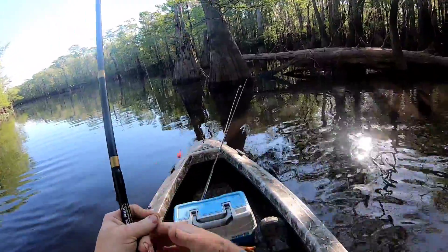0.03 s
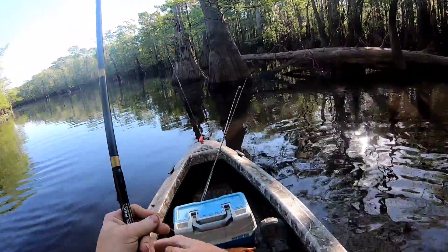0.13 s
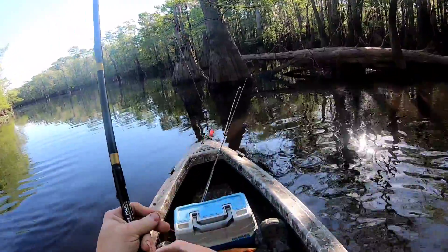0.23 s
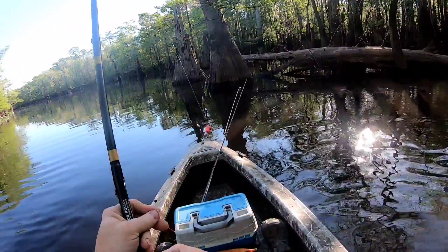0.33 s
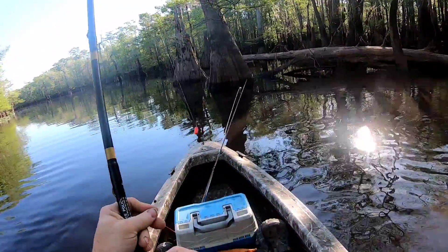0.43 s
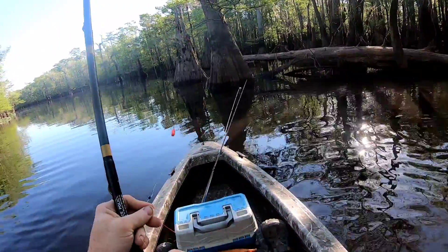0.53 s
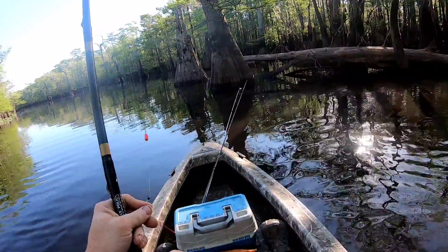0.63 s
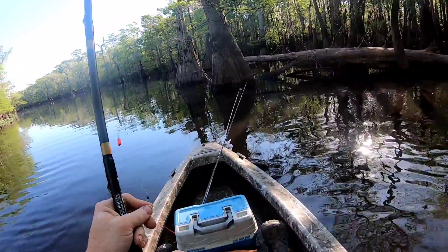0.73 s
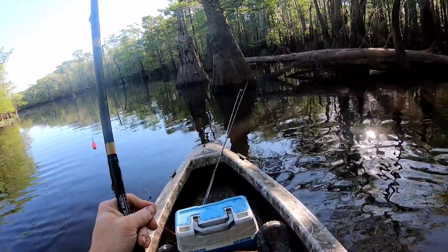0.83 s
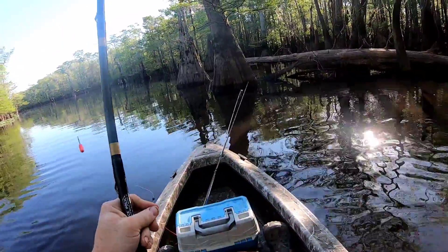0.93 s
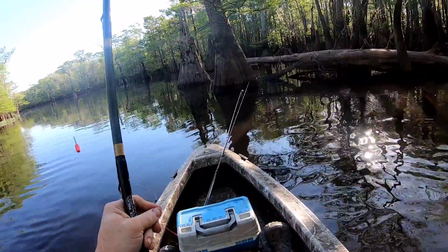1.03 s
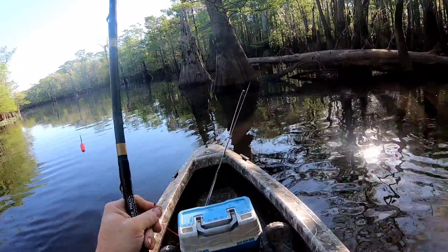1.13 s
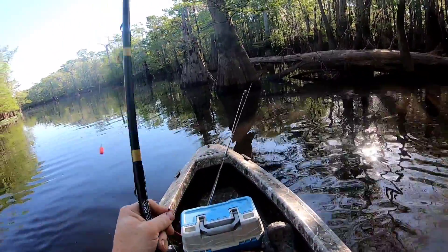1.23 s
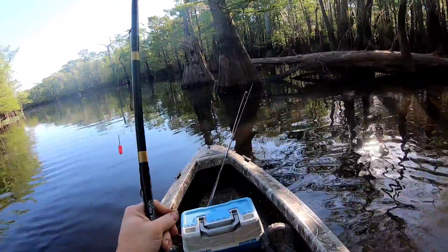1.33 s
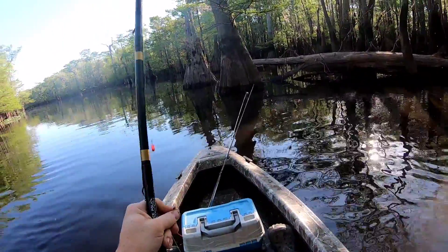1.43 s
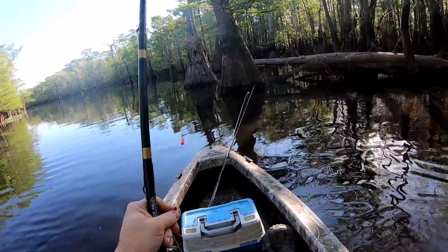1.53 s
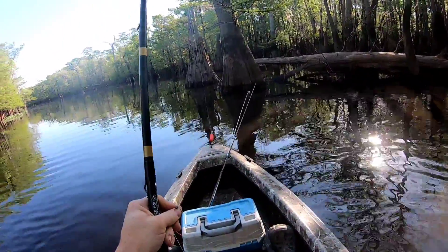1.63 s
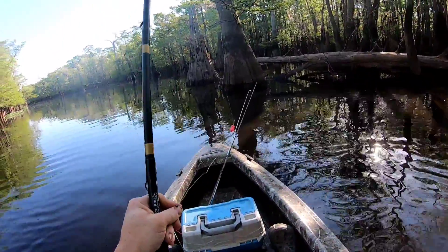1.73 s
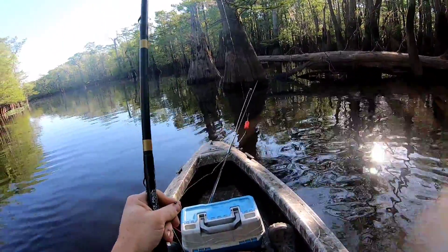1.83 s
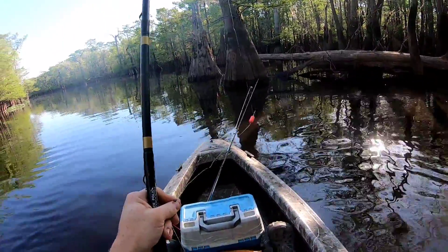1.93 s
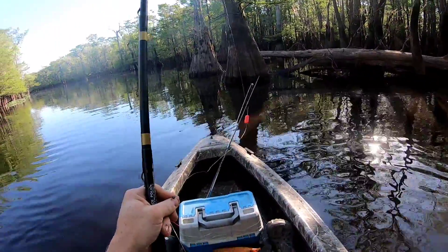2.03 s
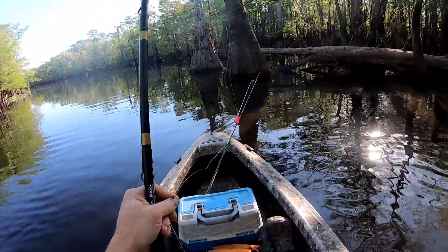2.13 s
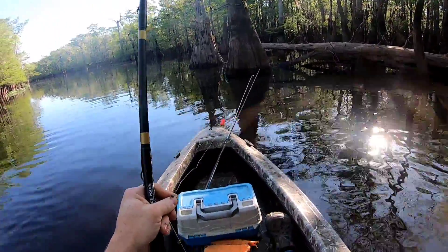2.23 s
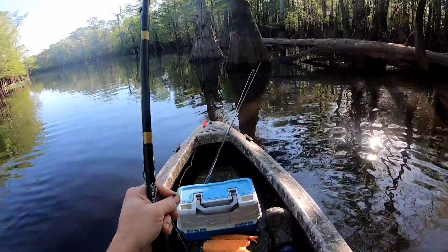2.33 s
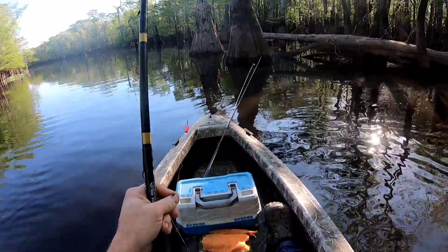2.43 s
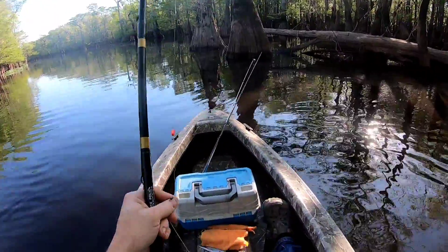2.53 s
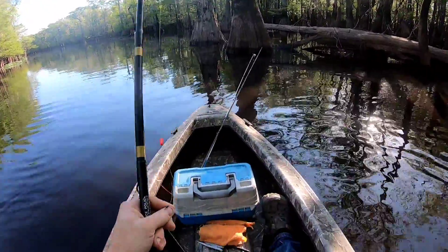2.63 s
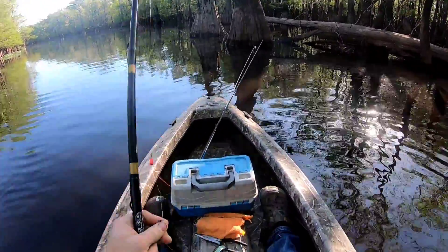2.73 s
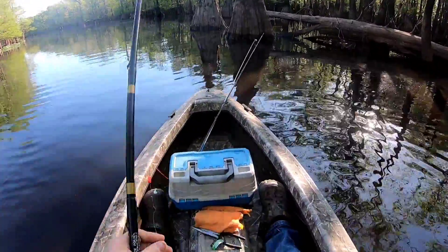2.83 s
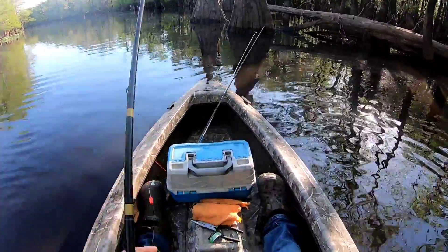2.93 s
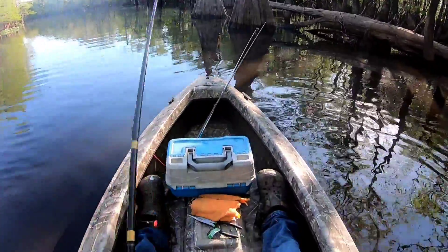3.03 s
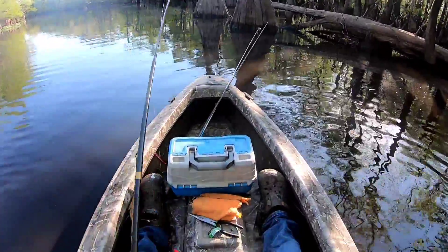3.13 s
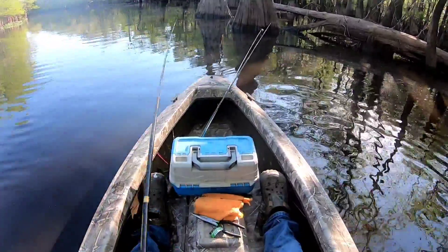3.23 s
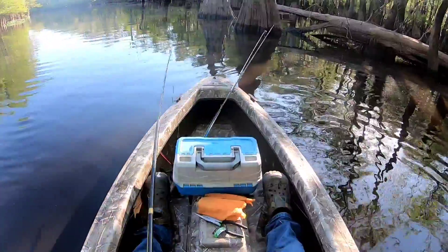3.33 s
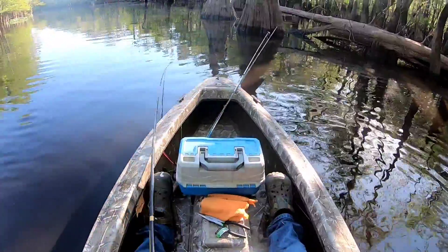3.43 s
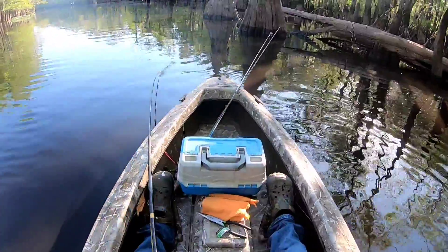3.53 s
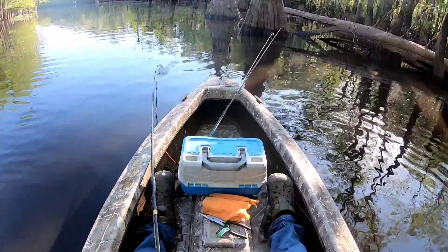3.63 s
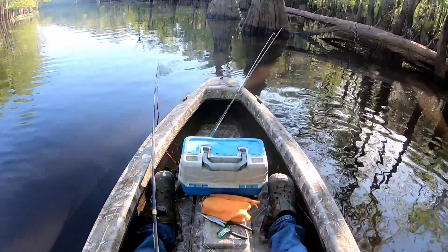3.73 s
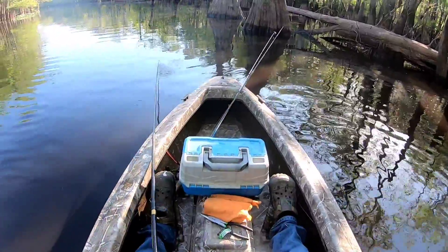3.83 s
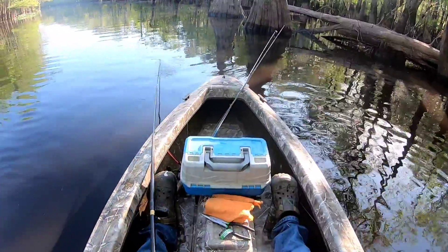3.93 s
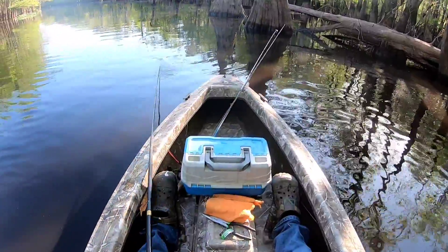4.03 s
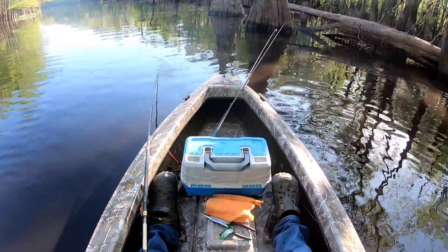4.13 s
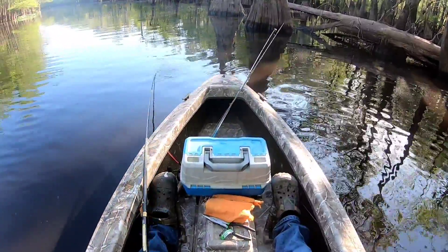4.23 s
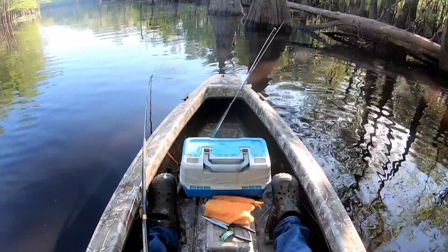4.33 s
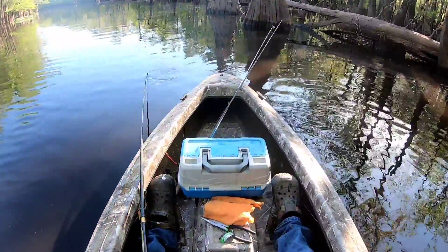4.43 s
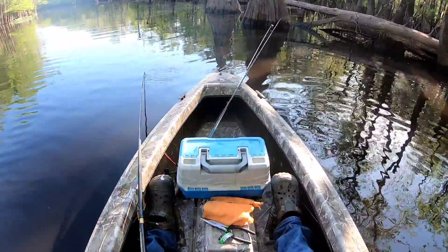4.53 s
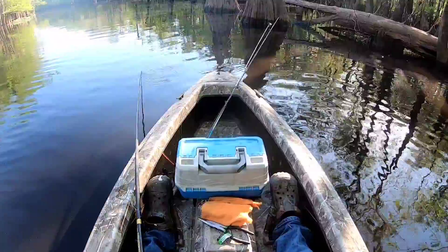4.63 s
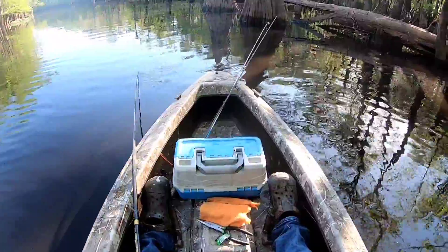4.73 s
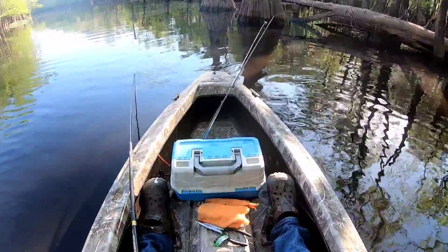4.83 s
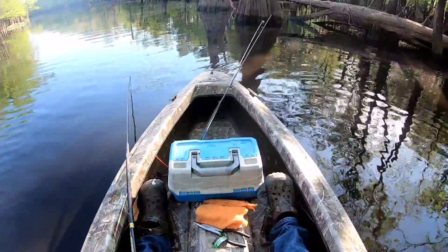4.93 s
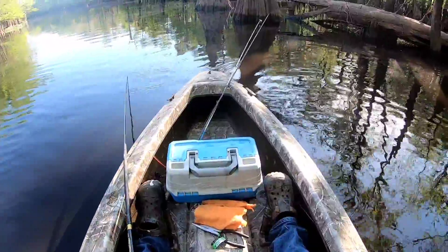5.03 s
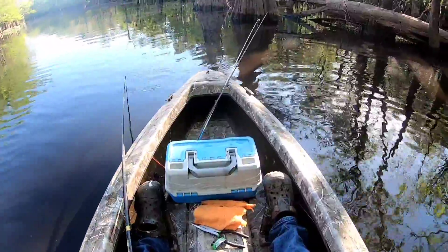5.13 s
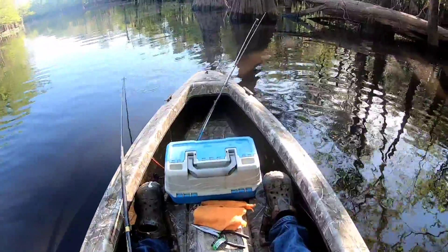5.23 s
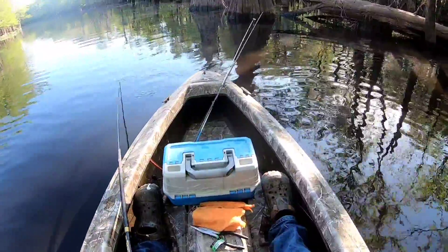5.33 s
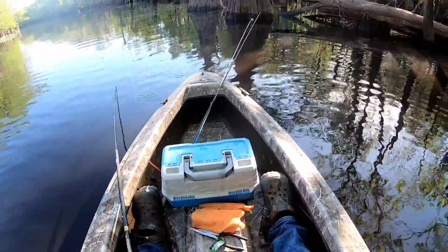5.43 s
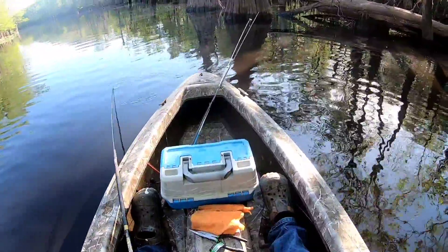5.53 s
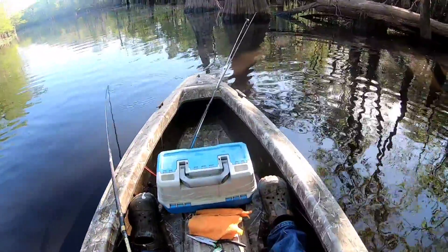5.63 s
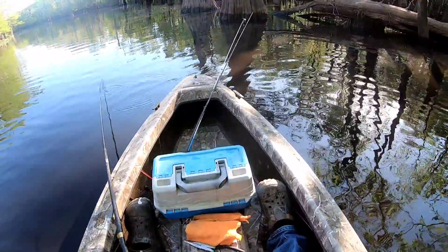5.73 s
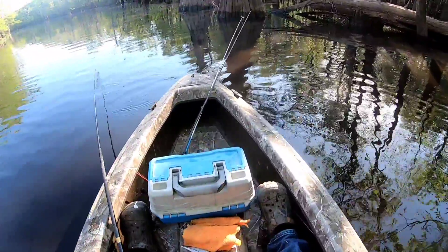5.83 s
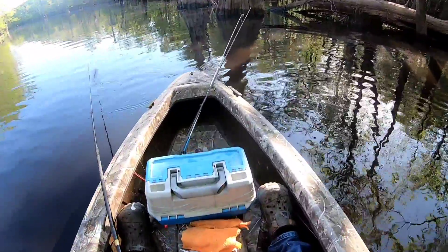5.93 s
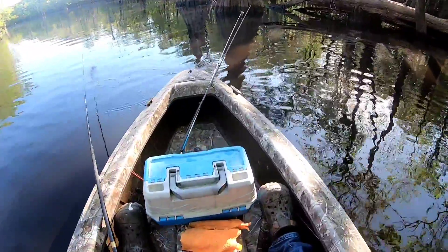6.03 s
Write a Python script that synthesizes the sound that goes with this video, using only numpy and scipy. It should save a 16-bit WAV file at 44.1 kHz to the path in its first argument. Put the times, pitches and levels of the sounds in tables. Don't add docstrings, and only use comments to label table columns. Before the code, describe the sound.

Fishing gear ticks, knocks and booms in a hollow plastic boat while birds chip, scold and a warbler's two-note song swells through echoing woods.

```python
import sys
import numpy as np
from scipy import signal
from scipy.fft import rfft, irfft, next_fast_len
from scipy.io import wavfile
from scipy.ndimage import uniform_filter1d

SR = 44100
rng = np.random.default_rng(int(sys.argv[2]) if len(sys.argv) > 2 else 0)


def boost_factor(decibels):
    exponent = np.asarray(decibels, float) / 20
    return 10 ** exponent


def int16_out(signal):
    q = np.round(np.clip(np.atleast_2d(signal).T, -1, 1) * 32767)
    wavfile.write(sys.argv[1], SR, q.astype(np.int16))


N = 268569


def in_time(rows):
    s, *columns = np.transpose(rows)
    return [np.interp(np.arange(N) / SR, s, column) for column in columns]


def over_octaves(points, hz, **ends):
    knots_hz, values = np.transpose(points)
    return np.interp(np.log(hz), np.log(knots_hz), values, **ends)


def at_hz(points, hz):
    return over_octaves(points, hz, left=-60, right=-60)


def rms_one(x):
    return x / np.sqrt(np.mean(x ** 2))


def drift(rate):
    steps = uniform_filter1d(rng.standard_normal(1200).repeat(4), size=4)
    return rms_one(np.interp(np.arange(N) / SR * rate * 4, np.arange(len(steps)), steps))


def add(out, s, sound, pan_db=0):
    at = int(s * SR)
    out[:, at:at + sound.shape[-1]] += sound[..., :N - at] * boost_factor([[pan_db / 2], [-pan_db / 2]])


def filtered(x, order, cut_hz, kind):
    return signal.sosfilt(signal.butter(order, cut_hz, kind, fs=SR, output="sos"), x)


def ear_pair(mid, side, alike):
    return np.sqrt(1 + alike) * mid + np.sqrt(1 - alike) * side * [[1], [-1]]


def whistle(s, hz, db):
    t = np.arange(s[0], s[-1], 1 / SR)
    phase = 2 * np.pi * np.cumsum(np.interp(t, s, hz)) / SR
    return boost_factor(np.interp(t, s, db)) * np.sin(phase)


def struck(modes, force, scatter, wide, count=4):
    hz, db, t60 = np.repeat(modes, count, axis=0).T[:, :, None]
    t = np.arange(int(np.clip(.8 * t60.max(), .01, .25) * SR)) / SR
    detune, mid, side = rng.normal(0, 1, (3, len(hz), 1))
    mid = np.sign(mid) * (.7 + .3 * abs(mid))
    rings = boost_factor(db - 60 * t / t60) * np.sin(2 * np.pi * hz * (1 + scatter * detune) * t)
    both = np.array([(rings * (mid + wide * side)).sum(0), (rings * (mid - wide * side)).sum(0)])
    sound = signal.fftconvolve(both, force[None], axes=1)
    sound = signal.lfilter(*signal.butter(2, hz.min() * .6, "high", fs=SR), sound)
    return sound / np.max(np.abs(sound.mean(0)))


# pitch_hz, likeness (0..1)
LIKENESS = [(60, 0.3), (180, 0.72), (400, 0.29), (1650, 0.099), (5000, .4), (15000, 0.28)]


def coloured(spectrum, patchy_db, grain_db=0.0):
    size = next_fast_len(N)
    white = rng.standard_normal((2, size)) * boost_factor(grain_db * np.minimum(rng.exponential(1, size), 6))
    mid, side = rfft(white)
    hz = np.maximum(np.fft.rfftfreq(size, 1 / SR), 1)
    alike = np.clip(over_octaves(LIKENESS, hz), 0, 1)
    pair = boost_factor(at_hz(spectrum, hz)) * ear_pair(mid, side, alike)
    low_hz, high_hz = spectrum[0][0], spectrum[-1][0]
    out = 0
    for centre in low_hz * 2 ** np.arange(0, np.log2(high_hz / low_hz) + .5, .5):
        low, high = np.searchsorted(hz, centre * np.sqrt([.5, 2]))
        band = np.zeros((2, high), complex)
        band[:, low:] = pair[:, low:high] * np.cos(np.pi * np.log2(hz[low:high] / centre)) ** 2
        out = out + irfft(band, size)[:, :N] * boost_factor(patchy_db * drift(14))
    return rms_one(out)


# pitch_hz, level_db (per Hz)
WOODS = [(180, -40), (300, -8.5), (447, -10), (737, 0), (1480, -11.5), (5700, -18.5), (9090, -23),
         (16000, -50.5)]
WOODS_DB = -71.5


def woods():
    return boost_factor(WOODS_DB - 2.5) * coloured(WOODS, patchy_db=0.56) * boost_factor([[-.6], [.6]])


# peak_s, fade_s (to drop 20 dB), air_db, hum_db
LURCHES = [(.3, .3, -70, -78), (.6, 0.18, -64, -60.5), (1.19, 0.08, -41, -69), (1.29, .08, -52, -72),
           (1.45, 0.15, -72, -69.5), (2.6, 0.3, -65, -56.5), (.8, 0.1, -83, -61), (3.06, 0.3, -70, -75),
           (3.25, 0.12, -69, -59.5), (3.62, .13, -55.5, -43), (4.13, 0.22, -85, -54.5),
           (4.259, 0.01, -48.5, -67), (4.6, 0.7, -71, -76), (1.6, .15, -90, -64), (1.98, .3, -86, -65),
           (2.33, .3, -84, -65), (5.25, 0.17, -51, -51.5), (5.7, 0.03, -57.5, -51.5),
           (5.87, 0.28, -53, -47.5), (6.08, 0, -53, -62)]
CALM_AIR_DB, CALM_HUM_DB = -88, -67


def lurching():
    s, fade, *levels = np.transpose(LURCHES)[:, :, None]
    t = np.arange(0, N + 64, 64) / SR
    gains = []
    for calm_db, db in zip((CALM_AIR_DB, CALM_HUM_DB), levels):
        swell = boost_factor(db - 20 * abs(t - s) / fade).max(0)
        gains.append(boost_factor(calm_db) + np.interp(np.arange(N) / SR, t, swell))
    return gains


# pitch_hz, level_db (per Hz)
HUM = [(40, -19), (70, -21), (108, -27), (135, -9.5), (180, -1), (215, -3.5), (260, -12), (320, -24)]


def hull_hum(gain):
    return gain * coloured(HUM, patchy_db=4.0)


def port_air(gain):
    right, own = rms_one(filtered(rng.standard_normal((2, N)), 4, [12, 36], "band"))
    left = .6 * np.roll(right, 420) + .3 * own
    return gain * np.array([left, 1.4 * right])


# at_s, rub_db, crisp_db (rustle re rubbing)
STIR = [(0, -95, 1), (.5, -79.5, -5.5), (.7, -73.5, -1.5), (1.0, -71, -7), (1.22, -71, 4.5),
        (1.52, -85, -6), (2.19, -90, -23), (2.47, -66.5, -7), (2.61, -61, -14.5), (2.75, -73, -8),
        (3.3, -75.5, -6), (3.68, -65.5, -1.5), (3.84, -69.5, -14), (4.09, -69.5, -19.5), (4.36, -86, -0.5),
        (4.6, -75.5, -6), (5.45, -74.5, -3), (6.09, -60, -7.5)]
# pitch_hz, level_db (per Hz)
RUB = [(250, -3), (330, 2.5), (700, -4), (900, -4), (1300, -4.5), (1800, -19.5)]
# pitch_hz, level_db (per Hz)
RUSTLE = [(900, -3.5), (1400, 3.5), (2500, 0), (4000, -3), (6500, -12.5), (9000, -16), (12000, -36)]


def cloth():
    rub_db, crisp_db = in_time(STIR)
    rubbing = boost_factor(rub_db + 2.0) * coloured(RUB, patchy_db=1.5, grain_db=3.0)
    gain = boost_factor(4.5) * (boost_factor(rub_db + crisp_db) + shaken() + sliding())
    return rubbing + gain * coloured(RUSTLE, patchy_db=1, grain_db=4.0) * boost_factor(2.0 * drift(40))


# start_s, panel_db (peak), crack_db (re panel), wall_hz (nearest wall tone), stretch (of decay)
THUMPS = [(0.086, -52.5, -4.5, 870, 0.72), (0.218, -53.5, -9.5, 830, 0.92), (0.533, -53, -12, 710, 0.97),
          (0.767, -49, -28, 506, .99), (0.801, -56, -26, 526, .99), (2.454, -47.5, -2.5, 1160, 0.47),
          (2.549, -36, -15, 513, 0.63), (3.452, -53.5, -3, 1460, .99), (3.492, -13.5, 2, 1160, 0.85),
          (3.741, -52.5, -6, 743, .99), (3.862, -55, -23, 1255, 0.98), (4.201, -50.5, -1.5, 805, 0.5),
          (4.313, -54.5, 2.5, 1340, 1), (4.823, -50, -1, 1166, 0.47), (4.967, -52.5, -7, 1283, 0.33),
          (5.179, -24.5, -10.5, 570, 0.61), (5.659, -22, -7, 790, .75), (5.7325, -37, 11.5, 670, 0.98),
          (5.774, -26, -39, 544, 0.53), (6.027, -23.5, -11.5, 726, 0.88)]
# start_s, panel_db (peak), wall_hz (nearest wall tone), stretch (of decay)
RAPS = [
    (1.069, -27, 1590, 0.26),
    (1.2154, -36.5, 1360, 0.34),
    (1.358, -60, 1440, .53),
    (3.212, -30, 870, 0.53),
    (3.223, -30, 1410, 0.91),
    (4.28, -61.5, 1125, 1),
    (5.085, -42, 1600, 0.68),
]
THUMP_BOOM_DB, RAP_BOOM_DB, RAP_CRACK_DB = -6, -40, 1
BOOM_GROWTH = 0.11


def blows():
    heavy = [(s, db, THUMP_BOOM_DB + BOOM_GROWTH * db, crack_db, hz, stretch)
             for s, db, crack_db, hz, stretch in THUMPS]
    light = [(s, db, RAP_BOOM_DB, RAP_CRACK_DB, hz, stretch) for s, db, hz, stretch in RAPS]
    return sorted(heavy + light)


def shaken():
    kicks = np.zeros(N)
    s, db = np.transpose(THUMPS)[:2]
    kicks[(s * SR).astype(int)] = boost_factor(db - 43.5)
    return signal.lfilter([1], [1, -boost_factor(-60 / (0.5 * SR))], kicks)


def dense_modes(bands, strength_db, focus_db, dull_db, wide):
    out, t = 0, np.arange(SR // 4) / SR
    white = rng.standard_normal((2, 2, N))
    for k, (hz, own_db, t60) in enumerate(bands):
        fading = np.full((2, N), 1e-9)
        levels_db = strength_db - dull_db * np.log2(hz / bands[0][0])
        for (s, *_, wall_hz, stretch), db in zip(blows(), levels_db):
            off_tone_db = focus_db * abs(np.log2(hz / wall_hz))
            add(fading, s - .0005, boost_factor(db + own_db - off_tone_db - 60 * t / (t60 * stretch)))
        mid, side = white[k % 2]
        noise = fading * [mid + wide * side, mid - wide * side]
        out = out + filtered(noise, 3, [hz / 1.15, hz * 1.15], "band") * np.sqrt(SR / hz)
    return out


# pitch_hz, level_db, t60_s
PANEL = [(347, -7.5, 0.33), (433, -8.5, 0.31), (513, -4, 0.13), (698, -4, 0.21), (841, -5.5, 0.15),
         (1210, 1, 0.099), (1564, 1.5, 0.064), (2016, -4.5, 0.11)]
# pitch_hz, level_db, t60_s
CRACK = [(2493, -3.5, 0.097), (3270, -3, 0.1), (4420, -3.5, 0.061), (5600, -5, 0.055), (6380, -2.5, 0.039),
         (9050, -10, 0.04), (11800, -25, 0.027)]


def hull_walls():
    _, db, _, crack_db, _, _ = np.transpose(blows())
    dull_db = .6 * np.maximum(-crack_db, 0)
    walls = dense_modes(PANEL, db - 5, focus_db=8.0, dull_db=0 * db, wide=0.3)
    return walls + dense_modes(CRACK, db + crack_db - 11, focus_db=-0.5, dull_db=dull_db, wide=0.61)


# pitch_hz, level_db, t60_s
BOOM = [(68.9, -21, .3), (87.5, -19, .3), (117.6, -8, 0.2), (151.2, -5, .25), (171.75, 0, .3),
        (209.7, -7, 0.27), (248.6, -7.5, .28), (300.6, -15.5, 0.3), (353.9, -10, .2)]


def hull_floor():
    floor, t = np.full((2, N), 1e-12), np.arange(SR // 12) / SR
    for s, panel_db, boom_db, *_ in blows():
        level_db = panel_db + boom_db
        rough = 0.017 * rng.standard_normal(len(t)) * np.exp(-t / 0.0034)
        push = t * (np.exp(-t / 0.00029) + rough)
        lasts = np.clip(boost_factor(.5 * (level_db + 21)), .75, 1)
        boom = struck(np.array(BOOM) * [1, 1, lasts], push, scatter=.05, wide=0.048, count=3)
        add(floor, s + 0.009, boost_factor(level_db + 7.0) * boom, -.3)
    return filtered(floor, 2, 75, "high")


# start_s, length_s, start_hz, end_hz, level_db
PIPES = [
    (0.103, 0.17, 2605, 2480, -79),
    (0.443, 0.086, 2520, 2520, -76),
    (0.905, 0.088, 7650, 7730, -73.5),
    (.96, 0.093, 7800, 8600, -82),
    (3.401, 0.07, 2840, 2785, -80.5),
    (3.63, .05, 8200, 8200, -74),
]
# start_s, length_s, start_hz, end_hz, level_db
BUZZES = [(1.44, 0.11, 5500, 5900, -88), (1.53, .06, 6150, 6350, -84), (1.59, 0.02, 4300, 3800, -83),
          (1.69, 0.1, 5400, 5800, -87), (1.795, 0.06, 6000, 6370, -82), (1.87, 0.02, 4500, 3800, -82),
          (1.93, 0.22, 6850, 6850, -81), (2.145, 0.025, 6400, 5200, -78), (2.22, 0.06, 6800, 7400, -85),
          (2.3, .08, 7050, 6900, -81), (2.362, 0.022, 6100, 5300, -76), (5.321, 0.34, 1253, 1316, -75)]
PIPE_SHAKE, BUZZ_SHAKE = 0.0012, 0.022


def far_birds():
    out, share = np.zeros((2, N)), np.linspace(0, 1, 40)
    swell_db = np.interp(share, [0, .15, .85, 1], [-15.0, 2.5, -1.5, -19.0])
    for calls, shake in ((PIPES, PIPE_SHAKE), (BUZZES, BUZZ_SHAKE)):
        for s, length, start_hz, end_hz, db in calls:
            hz = start_hz + (end_hz - start_hz) * share + shake * start_hz * rng.standard_normal(40)
            add(out, s, whistle(length * share, hz, db + swell_db), -2.0)
    return out


# start_s, level_db (peak), ring_hz, swell_ms, t60_ms
PUSHES = [(2.58, -46.5, 117.3, 16, 350), (4.101, -41, 224.3, 28, 134), (4.158, -45.5, 233.7, 15, 230),
          (1.0657, -42, 6960, 0.17, 3.3), (1.0715, -19.5, 6630, 0.11, 3.6), (1.069, -38, 342, 0.7, 14.6),
          (3.121, -47, 476, 3.1, 42), (3.475, -46.5, 2400, 0.4, 8), (3.482, -42.5, 892, 3.5, 24),
          (5.114, -40, 1680, .6, 8), (5.298, -47, 118.4, 6.1, 280), (5.799, -27, 105.8, 22.6, 158),
          (.56, -55, 300, 10, 100), (.79, -53, 300, 15, 130), (2.56, -43, 260, 6, 200),
          (3.112, -51, 300, 6, 70), (3.63, -50, 105, 20, 120), (3.245, -50, 190, 8, 120),
          (4.15, -53, 110, 15, 150), (5.19, -33, 160, 6, 250), (5.79, -40, 600, 3, 120),
          (6.034, -30, 165, 5, 150), (.377, -58, 800, 1.5, 25), (.755, -59, 1150, 8, 40),
          (.785, -64, 4800, 1.5, 12), (.815, -55, 650, 5, 60), (1.196, -51, 2500, .6, 10),
          (1.252, -54, 2600, .6, 12), (1.384, -59, 3200, .2, 4), (2.52, -59, 1200, 3, 30),
          (2.575, -48, 700, 4, 80), (3.093, -60, 1200, 2, 20), (3.465, -55, 7000, .8, 10),
          (5.186, -35, 275, 5, 200)]


def pushes():
    out = np.zeros((2, N))
    for s, level_db, hz, swell_ms, t60_ms in PUSHES:
        n = int(swell_ms * SR / 500)
        force = np.hanning(n) * np.sin(2 * np.pi * hz * np.arange(n) / SR)
        add(out, s, boost_factor(level_db) * struck([(hz, 0, t60_ms / 1000)], force, scatter=0.13, wide=0.044, count=3))
    return out


# start_s, level_db (peak), ring_hz, t60_ms
TICKS = [(0.606, -51, 2190, 3.6), (1.1052, -47, 3570, 19), (1.1312, -33, 2920, 19),
         (1.1414, -53, 5700, 7.3), (1.1513, -45, 3340, 8), (1.1768, -44, 3480, 28), (1.1865, -49, 3400, 12),
         (1.219, -40, 2390, 7.4), (1.2205, -46, 5500, 8), (1.221, -45, 3700, 14), (1.2825, -51, 3500, 15),
         (1.3716, -54, 4000, 4.6), (1.529, -58.5, 3600, 13), (2.0891, -51.5, 2800, 8.9),
         (3.2232, -27, 5300, 6), (3.2236, -42, 10400, 50), (3.122, -57, 3900, 15), (3.688, -51, 2400, 14),
         (3.7, -50, 4500, 8), (4.6792, -51.5, 4270, 8), (5.0875, -35.5, 2880, 12), (5.2255, -34, 2660, 14),
         (5.7325, -30, 6300, 5), (5.0877, -44, 7000, 3), (5.228, -48, 6000, 8), (4.825, -54, 6500, 4),
         (4.912, -58, 9500, 6), (3.15, -60, 4300, 20), (1.082, -50, 2200, 8), (1.156, -50, 1500, 10),
         (1.165, -52, 3400, 8), (1.184, -52, 9000, 4), (1.235, -50, 3600, 10), (1.305, -55, 3000, 8)]


def ticks():
    out = np.zeros((2, N))
    for s, level_db, hz, t60_ms in TICKS:
        modes = [(hz, 0, t60_ms / 1000), (hz * .62, -9, t60_ms / 1400), (hz * 1.2, -9, t60_ms / 1600)]
        click = struck(modes, np.hanning(7), scatter=.09, wide=.2, count=3)
        add(out, s - .0005, boost_factor(level_db) * click, -2.5)
    return out


# pitch_hz, level_db (per Hz)
REEL_TONE = [(1100, -12), (2200, -7), (3000, -3.5), (3550, -1), (4200, -11), (6500, -10.5), (9000, -14),
             (13000, -32)]


def reel():
    s = 1.03 + np.cumsum([0, 0.04, 0.23, 0.06])
    gain = boost_factor(np.interp(np.arange(N) / SR, s, -62 - np.array([30, 0, 7, 40])))
    return gain * coloured(REEL_TONE, patchy_db=2.5, grain_db=5.0) * boost_factor(3.0 * drift(110))


# mid_sweep_s, level_db (peak), top_hz, stretch
CHIPS = [
    (2.493, -53, 6920, 1.3),
    (2.573, -53, 6720, 1.0),
    (2.644, -51, 6950, 1.3),
    (2.730, -51, 6750, .9),
    (2.819, -55, 6400, .9),
    (2.908, -54, 6480, .9),
    (3.02, -54, 7520, 3.6),
]
# at_s, share (of top pitch), level_db
CHIP_SHAPE = [(-.007, .47, -24), (-.005, .54, -13), (-.001, .72, -9), (.002, .88, 1), (.005, .95, 0),
              (.011, 1.0, -2), (.017, 1.0, -8), (.02, 1.0, -30)]


def chipper():
    out, (t, share, db) = np.zeros((2, N)), np.transpose(CHIP_SHAPE)
    for s, level_db, top_hz, stretch in CHIPS:
        stretched = np.where(t > .002, .002 + (t - .002) * stretch, t)
        chip = whistle(stretched, share * top_hz, db + level_db + rng.normal(0, 2.5, len(t)))
        add(out, s + t[0], chip, -1.0)
    return out


# landing_s, rise_s (to grow 20 dB), level_db
SLIDES = [
    (3.212, .012, -58),
    (3.492, .03, -50),
    (5.659, .03, -54),
    (6.027, .015, -56),
]


def sliding():
    s, rise, db = np.transpose(SLIDES)[:, :, None]
    t = np.arange(0, N, 16) / SR
    swell = (boost_factor(db - 20 * abs(s - t) / rise) * (s > t)).sum(0)
    return np.interp(np.arange(N) / SR, t, swell)


# pitch_hz, level_db, t60_s
ROD = [(781, -12, .1), (1120, 0, .04), (1233, -3, .05), (1480, -5, .05), (1916, -8, .06), (2051, -6, .04),
       (2789, -9, .05)]
# pitch_hz, level_db, t60_s
ROD_FLOOR = [(80.7, -22, .35), (145, -11, .26), (172, 1, .33), (205, -5, .3), (248, -2, .33),
             (334, -12, .35)]
ROD_S, ROD_DB, ROD_FLOOR_LAG_S, ROD_FLOOR_DB = 3.4925, -13, .0135, -20


def rod():
    out = np.zeros((2, N))
    rim = struck(ROD, np.hanning(12), scatter=.004, wide=.12, count=1)
    floor = struck(ROD_FLOOR, np.hanning(60), scatter=.004, wide=.05, count=1)
    add(out, ROD_S, boost_factor(ROD_DB) * rim, .5)
    add(out, ROD_S + ROD_FLOOR_LAG_S, boost_factor(ROD_FLOOR_DB) * floor)
    return out


# start_s, level_db
SCOLDS = [
    (4.413, -66.5),
    (4.519, -63),
    (4.628, -64),
    (4.724, -62),
    (4.846, -62),
    (4.963, -60.5),
    (5.078, -60.5),
    (5.185, -64),
    (5.286, -59.5),
]
# pitch_hz, level_db
BEAK = [(2800, -34), (3300, -11), (3750, -3), (4300, 0), (4750, -4), (5200, -9), (5700, -30)]
SCOLD_S, SCOLD_START_HZ, SCOLD_END_HZ = .096, 455, 515
SCOLD_WAVER, SCOLD_RASP = .025, .009


def scolder():
    out, share = np.zeros((2, N)), np.linspace(0, 1, 24)
    shape_db = np.interp(share, [0, .09, .82, 1], [-17, 0.5, -4.5, -28])
    for s, db in SCOLDS:
        hz = SCOLD_END_HZ - (SCOLD_END_HZ - SCOLD_START_HZ) * (1 - share / .72) ** 2
        hz = hz * np.interp(share, [0, .5, 1], rng.normal(1, SCOLD_WAVER, 3))
        for k in range(6, 13):
            rasped_hz = k * hz * rng.normal(1, SCOLD_RASP, 24)
            line_db = db + at_hz(BEAK, k * hz) + shape_db + rng.normal(0, 1.6, 24)
            add(out, s, whistle(SCOLD_S * share, rasped_hz, line_db), -1.0)
    return out * (1 + .7 * drift(120))


# rise_s, fall_s
SONG = [
    (4.5206, 4.6347),
    (4.6906, 4.818),
    (4.8788, 4.996),
    (5.063, 5.1791),
    (5.2415, 5.3752),
    (5.432, 5.563),
    (5.621, 5.761),
    (5.8262, 5.972),
    (6.0295, 6.17),
]
# at_s, pitch_hz, level_db
RISE_SHAPE = [(0, 6250, -20), (.003, 6320, -.5), (.009, 6500, -3), (.013, 6650, -18), (.018, 7050, -3),
              (.032, 8050, -5), (.04, 8600, -10), (.046, 9050, -28)]
# at_s, pitch_hz, level_db
FALL_SHAPE = [(-.028, 6020, -30), (-.022, 5980, -9), (-.006, 5720, -7), (.004, 5350, -2), (.014, 4900, -3),
              (.027, 4300, -4), (.035, 4120, -2.5), (.044, 4250, -8), (.05, 4260, -30)]
SWELL_END_S = 5.55
RISE_FULL_DB, RISE_SWELL_DB, RISE_CURVE = -43.5, 27, 1.66
FALL_FULL_DB, FALL_SWELL_DB, FALL_CURVE = -42.5, 18.5, 1
SONG_RASP_DB, SONG_WOBBLE = 2.5, .003


def warbler():
    out, (rises, falls) = np.zeros((2, N)), np.transpose(SONG)
    for notes, shape, full_db, swell_db, curve in (
            (falls, FALL_SHAPE, FALL_FULL_DB, FALL_SWELL_DB, FALL_CURVE),
            (rises, RISE_SHAPE, RISE_FULL_DB, RISE_SWELL_DB, RISE_CURVE)):
        knots, *contour = np.transpose(shape)
        t = np.arange(knots[0], knots[-1], .002)
        hz, db = (np.interp(t, knots, c) for c in contour)
        for s in notes[notes < N / SR]:
            level_db = full_db - swell_db * max(SWELL_END_S - s, 0) ** curve
            wobble, flutter = rng.standard_normal((2, len(t)))
            note_hz = hz * (rng.normal(1, 0.0079) + SONG_WOBBLE * wobble)
            note_db = db + level_db + SONG_RASP_DB * flutter - 2.5
            add(out, s + t[0] - .004, whistle(t, note_hz, note_db), -2.0)
    return out


def trunks(x, t60, gap, alike, cut_hz):
    t = np.arange(int(.9 * SR)) / SR
    uneven = boost_factor(1.5 * rng.standard_normal(len(t) // 60 + 1).repeat(60)[:len(t)])
    mid, side = rng.standard_normal((2, len(t))) * uneven
    echo = ear_pair(mid, side, np.clip(alike, 0, 1)) * boost_factor(-60 * t / t60) * (1 - np.exp(-t / gap))
    echo = filtered(echo, 1, cut_hz, "low")
    return signal.fftconvolve(x, echo / np.sqrt(np.sum(echo ** 2) / 2), axes=1)[:, :N]


# pitch_hz, left_re_right_db
WALL_PAN = [(60, -0.5), (130, -0.5), (290, 0.0), (640, -4.0), (1410, -1.5), (3100, 0.0), (6820, -1.5),
            (15000, 0.5)]
# pitch_hz, left_lead_radians
WALL_LEAD = [(100, 0), (5900, .1), (9000, 1.2), (15000, 1.4)]


def ports(x):
    size = next_fast_len(N)
    hz = np.maximum(np.fft.rfftfreq(size, 1 / SR), 1)
    db, lead = (over_octaves(curve, hz) * [[.5], [-.5]] for curve in (WALL_PAN, WALL_LEAD))
    return irfft(rfft(x, size) * boost_factor(db) * np.exp(1j * lead), size)[:, :N]


def scene():
    air, hum = lurching()
    out = woods() + hull_hum(hum) + port_air(air) + cloth() + reel()
    boat = ports(hull_walls() + hull_floor() + pushes() + ticks() + rod())
    out += boat
    out += boost_factor(-18.5) * trunks(filtered(boat, 2, 500, "high"), t60=0.36, gap=0.006, alike=0.92, cut_hz=20000)
    far = far_birds() + scolder()
    out += boost_factor(-2.5) * far + boost_factor(.5) * trunks(far, t60=.42, gap=0.0058, alike=0.45, cut_hz=8600)
    chips = chipper()
    bright_chips = filtered(chips + 1e-18, 2, 4500, "high")
    out += boost_factor(-2.5) * chips + boost_factor(3) * trunks(bright_chips, t60=0.52, gap=0.004, alike=0.29, cut_hz=9000)
    song = warbler()
    out += boost_factor(-1.5) * song + boost_factor(3.5) * trunks(song, t60=.55, gap=.008, alike=.2, cut_hz=15000)
    return out


def band_limit(x):
    return signal.sosfilt(signal.butter(12, 16470, fs=SR, output="sos"), x)


def record(dry):
    mix = signal.sosfilt(signal.cheby2(10, 60, 16300, fs=SR, output="sos"), dry)
    return band_limit(mix)


dry = scene()
out = record(dry)
int16_out(out)
```